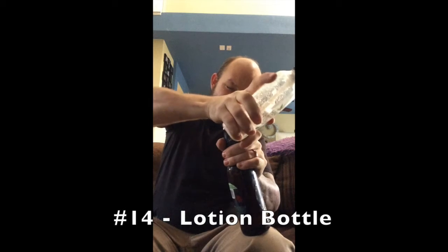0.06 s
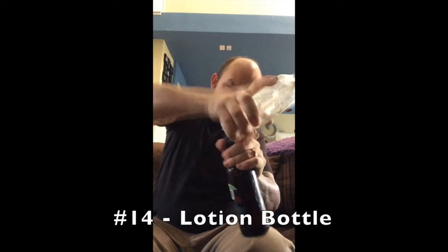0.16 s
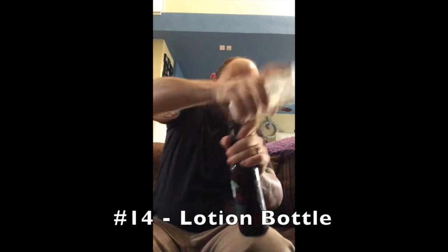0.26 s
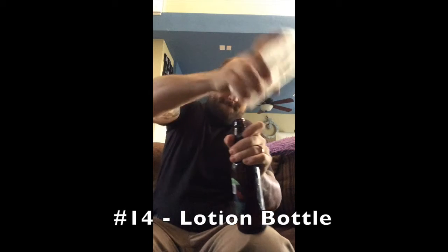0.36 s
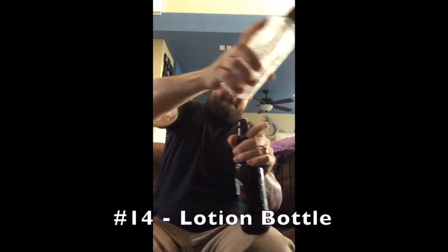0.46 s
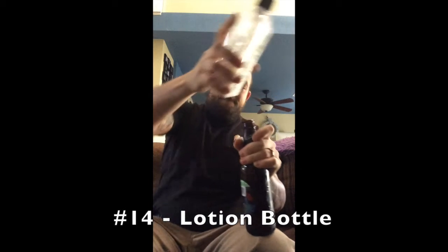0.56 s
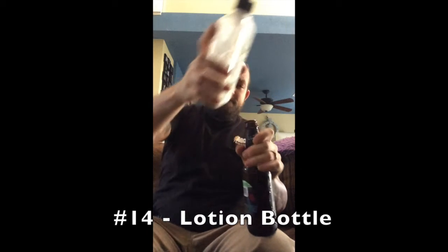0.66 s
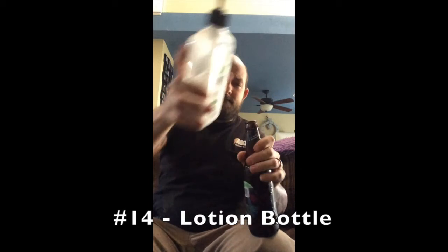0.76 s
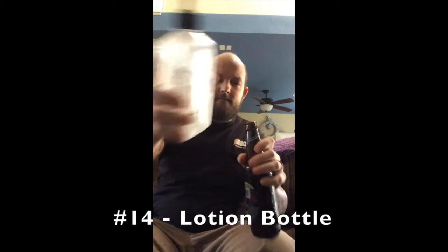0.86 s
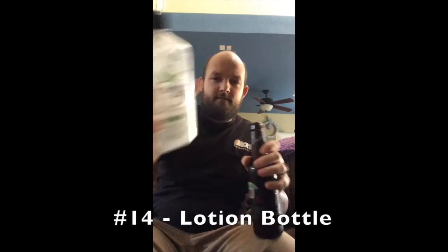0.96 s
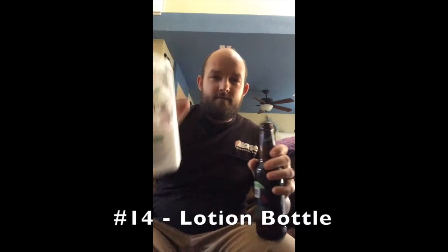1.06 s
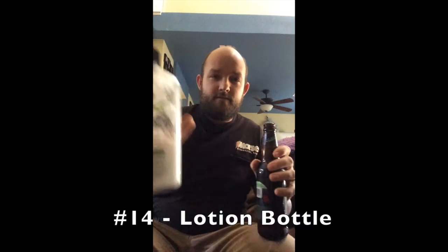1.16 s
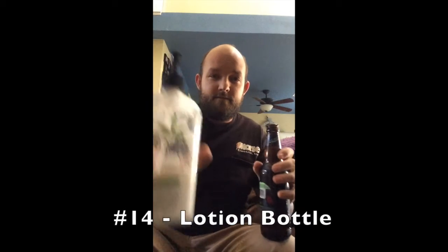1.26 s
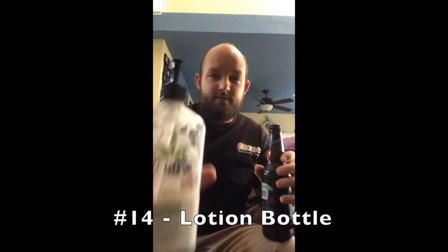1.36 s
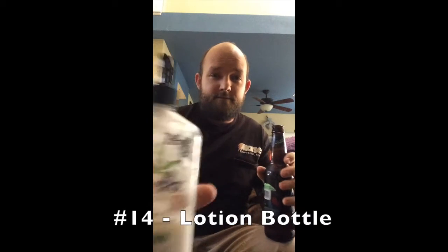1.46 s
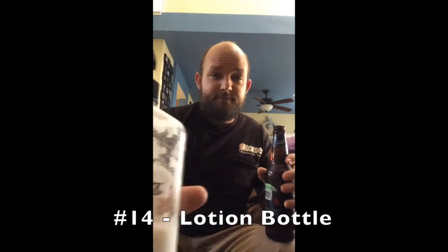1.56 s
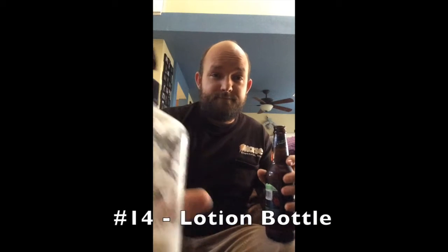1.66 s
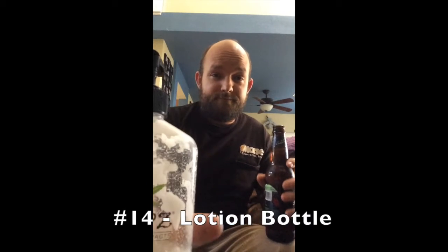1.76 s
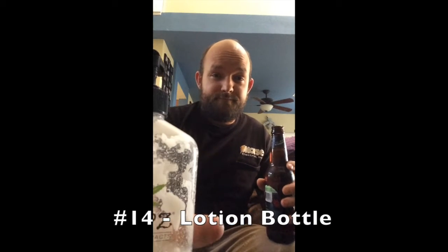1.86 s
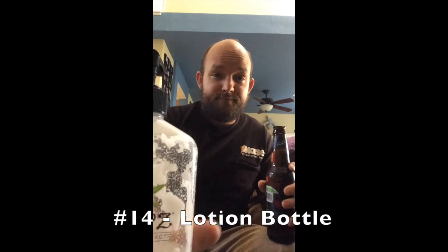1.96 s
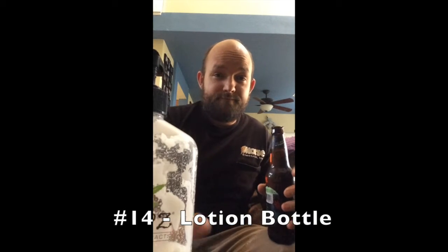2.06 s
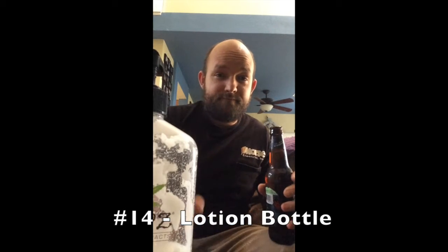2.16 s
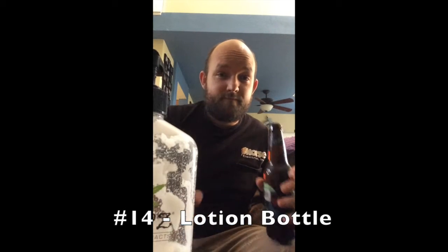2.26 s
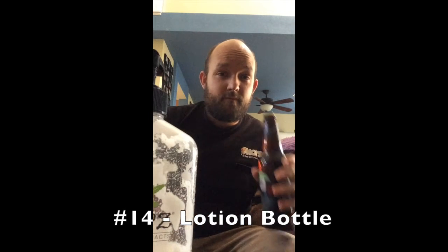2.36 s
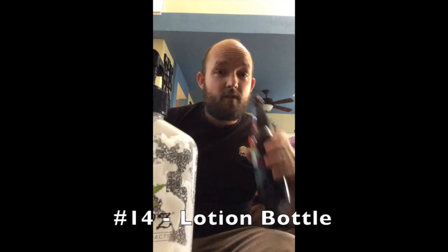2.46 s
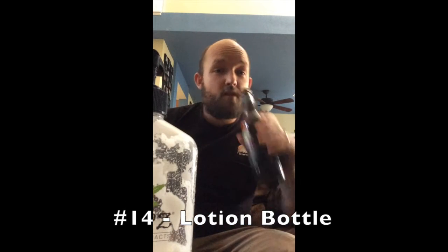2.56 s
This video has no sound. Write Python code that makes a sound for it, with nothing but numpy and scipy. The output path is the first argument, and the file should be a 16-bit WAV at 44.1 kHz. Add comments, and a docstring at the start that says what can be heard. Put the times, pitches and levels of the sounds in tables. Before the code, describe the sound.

A cap hisses and pops off a glass bottle, then a plastic bottle knocks down.

```python
"""A quiet room with a low rumble and faint rustling now and then.
Gas hisses from under a levered bottle cap. The cap scrapes and pops; the glass and the air in the
neck ring. The cap lands and small things tick. Later a plastic bottle is set down near the
microphone: it knocks on a table, which rings, and rocks on its base."""
import sys
import numpy as np
from scipy import signal
from scipy.fft import rfft, irfft, next_fast_len
from scipy.io import wavfile
from scipy.ndimage import uniform_filter1d

SR = 44100
rng = np.random.default_rng(int(sys.argv[2]) if len(sys.argv) > 2 else 0)


def store_wav(level_fs):
    """Save 16-bit WAV to argv[1]."""
    pcm = np.round(np.clip(np.atleast_2d(level_fs), -1, 1) * 32767)
    wavfile.write(sys.argv[1], SR, pcm.T.astype(np.int16))


N = 114660
TIME_S = np.arange(N) / SR
POP_S = 0.2048


def pop():
    """The cap snaps off, bottle and cap ring, and the room answers diffusely."""
    # Bottle and cap modes. Each row: frequency in Hz, relative level in dB, t60 in seconds.
    bottle_modes = [(123.5, -21.5, 0.036), (259.3, -13, .04), (576, -9, 0.045), (1065, -8.5, 0.026),
                    (1178, -2.5, 0.016), (1640, -14.5, 0.027), (2750, -7, 0.0061), (3440, -18.5, 0.037),
                    (3910, -13, 0.019), (5125, -11.5, 0.028), (5530, -18.5, .015), (6470, -13.5, .016),
                    (7040, -11, 0.013), (7890, -17, 0.022), (11530, -15, 0.0071)]
    # Lingering glass ring. Each row: centre in Hz, half-width in Hz, level in dB, t60 in seconds.
    glass_bands = [(775, 31, -46, 0.61), (3465, 35, -55, 0.85), (3480, 70, -54, 0.45), (5100, 69, -51, .5),
                   (5240, 70, -49, 0.39), (7950, 70, -56, 0.47)]
    # Spectra of the snap and the room's answer. Each row: frequency in Hz, relative density in dB.
    snap_spectrum = [(880, -28.5), (1500, 3.5), (2630, -7), (3570, -7.5), (4480, -18.5), (5090, -1),
                     (5900, -16), (7930, -12), (8580, -10), (14700, -16), (15800, -36.5)]
    answer_spectrum = [(88, -51), (150, -17.5), (274, -7.5), (472, -12.5), (573, -3.5), (696, -5),
                       (813, -4.5), (950, -13), (1270, -15.5), (1740, -14), (2230, -23), (3050, -30.5),
                       (3560, -19), (4590, -32), (5360, -19.5), (6020, -32), (6380, -25.5), (9410, -30.5),
                       (15300, -41.5)]
    snap = amp(-16) * decay(POP_S, t60_s=0.024, rise_s=0.0005) * noise(snap_spectrum, patchy_db=3.5)
    glass = np.zeros(N)
    for centre_hz, width_hz, db, t60_s in glass_bands:
        band = filtered(rng.standard_normal(N), lambda hz: 1 / (1 + ((hz - centre_hz) / width_hz) ** 2))
        glass += amp(db) * decay(POP_S, t60_s, rise_s=0.014) * unit(band)
    bottle = amp(-6) * ring(POP_S, bottle_modes, rise_s=0.00067)
    return bottle + snap + glass + amp(-31) * diffuse_answer(POP_S, answer_spectrum, rise_s=0.014)


def neck():
    """The air in the neck rings at the pop; its tone returns in ever weaker, wavering swells."""
    # Swells of the tone. Each row: start in seconds, level in dB, length in seconds.
    swells = [(0.3167, -32.5, 0.058), (.41, -45.5, 0.046), (.51, -53, 0.066), (.6, -59.5, 0.035)]
    waver_hz, fall_s = 3.5, 0.0081
    returns = np.zeros(N)
    for start_s, db, length_s in swells:
        hz = 825 + waver_hz * rng.normal()
        gate = np.clip((start_s + length_s - TIME_S) / fall_s + 1, 0, 1)
        returns += gate * mode(start_s, hz, db, t60_s=0.25, rise_s=0.0029)
    first = mode(POP_S, hz=824, db=-5.5, t60_s=0.079, rise_s=0.0031)
    return room(first, wet_db=-23.5) + room(returns, wet_db=-12.5)


def setdown():
    """A plastic bottle slaps down, its edge rings, it rocks; the table rings and shudders."""
    # Modes of table with bottle, and of the bottle's edge. Each row: frequency in Hz, gain in dB, t60 in
    # seconds.
    table_modes = [(87, -12.5, 0.054), (133, -16.5, 0.28), (289, -23, .1), (265, -18, 0.015),
                   (341, -8, 0.044), (413, 1, 0.026), (478, -3, 0.047), (580, -11, 0.0097)]
    edge_modes = [(750, -12.5, 0.012), (1150, -15.5, 0.0088), (1402, -10.5, 0.0078), (2050, -18.5, 0.015),
                  (2270, -28, 0.0098)]
    # Spectra of the slap and of table and room answering. Each row: frequency in Hz, relative dB.
    slap_spectrum = [(1470, -15), (2500, -6), (4300, -10.5), (5880, -15), (7210, -20), (8630, -21),
                     (14300, -29.5), (16300, -58)]
    shudder_spectrum = [(65, -45), (110, -3), (152, -3), (202, -12.5), (322, 1.5), (512, -8), (591, -7),
                        (667, -16), (833, -15), (903, -23), (1060, -15), (1130, -20), (2250, -27),
                        (3300, -40.5), (3580, -34.5), (4950, -42.5), (13900, -50)]
    # The bottle rocks on its base. Each row: start in seconds, gain in dB.
    rocks = [(1.81, -22), (1.829, -25.5)]
    slap_s, knock_s, edge_s, table_rise_s = 1.7748, 1.7761, 1.7772, 0.0024
    slap = amp(-24.5) * decay(slap_s, t60_s=0.013, rise_s=0.00052) * noise(slap_spectrum, patchy_db=-1.5)
    knock = amp(-4.5) * ring(knock_s, table_modes, table_rise_s)
    edge = ring(edge_s, edge_modes, rise_s=0.00038)
    rocking = sum(amp(db) * ring(start_s, table_modes[2:], table_rise_s) for start_s, db in rocks)
    shudder = amp(-25.5) * diffuse_answer(knock_s, shudder_spectrum, rise_s=0.0038)
    return slap + knock + edge + rocking + shudder


def gas():
    """The jet swells as the cap lifts, deepens as the gap widens and stops when the pressure is gone."""
    # Hiss of the narrow and the wide gap. Each row: time in seconds, level in dB.
    narrow_levels = [(0.0, -99), (0.014, -88.5), (0.018, -58), (0.068, -36.5), (0.1, -35), (0.116, -41),
                     (0.134, -67), (0.17, -85)]
    wide_levels = [(.03, -99), (.044, -70), (.05, -52), (.09, -44), (.115, -48), (.13, -75), (.15, -100)]
    # Their spectra. Each row: frequency in Hz, relative density in dB.
    narrow_spectrum = [(1500, -50), (2600, -16), (3060, -11), (3410, 1), (4420, -6), (7760, 4.5),
                       (8890, -5.5), (10100, 6.5), (10900, -6.5), (13600, 6), (15300, -3)]
    wide_spectrum = [(500, -50), (800, -10), (1330, -4), (1790, 2), (2400, -2), (3200, -20), (5000, -50)]
    narrow = envelope(narrow_levels + [(POP_S, -120)]) * noise(narrow_spectrum, patchy_db=2)
    wide = envelope(wide_levels) * noise(wide_spectrum, patchy_db=2)
    return narrow + wide


def scrape():
    """The cap slips on the lip, ever louder until the pop."""
    # Scrape spectrum. Each row: frequency in Hz, relative density in dB.
    spectrum = [(900, -40), (1700, 0), (2600, -14), (3500, -6), (4800, -20), (6500, -8), (8500, -26),
                (15000, -32)]
    start_s, start_db, growth_db = 0.19, -58, 24
    progress = np.clip((TIME_S - start_s) / (POP_S - start_s), 0, 1)
    slipping = (progress > 0) & (progress < 1)
    return amp(start_db + growth_db * progress) * slipping * noise(spectrum, patchy_db=2)


def ticks():
    """Small ticks and bumps: each a short ring and a noise click around the same pitch."""
    # Each row: start in seconds, level in dB, pitch in Hz, ring t60 in seconds, click over ring in dB.
    hits = [(.2295, -36, 5260, .04, -4.5), (.5198, -51.5, 9760, 0.027, 5.5),
            (.521, -60.5, 6950, 0.037, -14), (0.593, -65, 5920, 0.011, -1),
            (0.7686, -47.5, 3400, 0.042, -7.5), (0.789, -52.5, 1720, 0.022, -18),
            (0.8891, -55, 1830, 0.012, 2), (.888, -59.5, 7700, .012, -4), (.913, -66, 5160, 0.012, -8),
            (0.981, -41, 125, 0.07, -28), (1.2133, -65, 4050, 0.013, -1), (1.669, -57, 2450, 0.021, -1),
            (1.685, -51, 505, 0.044, -3.5), (2.464, -53, 1030, 0.021, -28.5),
            (2.4777, -41.5, 6330, 0.01, -7.5), (2.477, -63, 11800, 0.0069, 11),
            (2.587, -56, 3830, 0.0084, -3.5)]
    width_octaves, top_hz, low_edge_ratio = 1.46, 14320, 0.34
    grit, out = rng.standard_normal(N), np.zeros(N)
    for start_s, db, pitch_hz, t60_s, click_db in hits:
        def click_band(hz):
            octaves = np.log2((hz + 1) / pitch_hz)
            edges = (hz / top_hz) ** 10 + (low_edge_ratio * pitch_hz / (hz + 1)) ** 2
            return np.exp(-(octaves / width_octaves) ** 2 - edges)

        click = decay(start_s, t60_s=0.011, rise_s=0.0005) * unit(filtered(grit, click_band))
        out += mode(start_s, pitch_hz, db, t60_s, rise_s=0.0002) + amp(db + click_db) * click
    return out


def background():
    """Room air, a low wavering rumble and faint rustling."""
    # Their spectra. Each row: frequency in Hz, relative density in dB.
    air_spectrum = [(180, -30), (300, -1), (426, -5), (616, -6.5), (791, -10.5), (1140, -16.5),
                    (1330, -10.5), (2820, -25), (6090, -31), (7690, -31.5), (14800, -41.5), (16300, -54)]
    rumble_spectrum = [(15, -48), (25, -11), (70, -2.5), (124, -6), (145, -12.5), (178, 2), (211, -9),
                       (270, -5), (300, -17), (390, -47.5), (660, -120)]
    rustle_spectrum = [(1180, -13), (2000, -7), (3870, -14), (4610, -24), (13700, -19), (16000, -49)]
    # Rumble and rustle over time. Each row: time in seconds, level in dB.
    rumble_levels = [(0.0, -62), (0.25, -54), (0.41, -63), (0.62, -62), (1.14, -60.5), (1.33, -60.5),
                     (1.8, -58.5), (2.03, -68.5), (2.21, -60.5), (2.37, -59.5), (2.6, -61)]
    rustle_levels = [(.6, -92.5), (.885, -92), (.895, -64.5), (.95, -95.5), (1.2, -97), (1.22, -80),
                     (1.37, -76.5), (1.48, -103), (1.9, -89), (1.98, -76), (2.02, -68.5), (2.05, -97),
                     (2.13, -91), (2.16, -70.5), (2.35, -79.5), (2.5, -70.5), (2.6, -78)]
    air = amp(-64) * noise(air_spectrum, patchy_db=2)
    rumble = envelope(rumble_levels) * noise(rumble_spectrum, patchy_db=1.5)
    rustle = envelope(rustle_levels) * noise(rustle_spectrum, patchy_db=1.5)
    return air + rumble + rustle


def room(x, wet_db):
    """x plus the room's delayed reverberation."""
    predelay_s = 0.017
    tail = room_tail(SR // 2)
    impulse = np.pad(tail / np.linalg.norm(tail), (round(predelay_s * SR), 0))
    return x + amp(wet_db) * signal.fftconvolve(x, impulse)[:N]


def diffuse_answer(start_s, spectrum, rise_s):
    """A coloured room tail that swells after a blow."""
    start, top_hz = round(start_s * SR), spectrum[-1][0]
    tail = np.pad(room_tail(N - start), (start, 0))
    tail = filtered(tail, lambda hz: amp(log_interp(spectrum, hz)) * lowpass(hz, top_hz))
    early_rms = np.std(tail[start:start + SR // 20])
    return tail / early_rms * decay(start_s, np.inf, rise_s) ** 2


def room_tail(samples):
    """Noise in which each frequency dies at the room's rate."""
    # Reverberation times. Each row: frequency in Hz, t60 in seconds.
    room_t60 = [(100, 0.37), (400, 0.28), (1500, .33), (3500, 0.4), (6000, 0.31), (9000, 0.27),
                (15000, 0.25)]
    hz, time_s, bins = signal.stft(rng.standard_normal(samples), SR, nperseg=256)
    fade = amp(-60 * time_s / log_interp(room_t60, hz)[:, None])
    return signal.istft(bins * fade, SR, nperseg=256)[1][:samples]


def noise(spectrum, patchy_db):
    """Coloured noise of rms 1 with random gain patches in time and frequency."""
    bins = signal.stft(rng.standard_normal(N + 512), nperseg=512)[2]
    patches = uniform_filter1d(rng.standard_normal(bins.shape), size=6, axis=0)
    patches = uniform_filter1d(patches, size=8, axis=1)
    patchy = signal.istft(bins * amp(patchy_db * unit(patches)), nperseg=512)[1][:N]
    return unit(filtered(patchy, lambda hz: amp(log_interp(spectrum, hz)) * lowpass(hz, top_hz=15330)))


def ring(start_s, modes, rise_s):
    """Modes struck together."""
    return sum(mode(start_s, hz, db, t60_s, rise_s) for hz, db, t60_s in modes)


def mode(start_s, hz, db, t60_s, rise_s):
    """One damped sine."""
    return amp(db) * decay(start_s, t60_s, rise_s) * np.sin(2 * np.pi * hz * (TIME_S - start_s))


def decay(start_s, t60_s, rise_s):
    """Envelope of a blow: exponential rise and fall."""
    age_s = np.maximum(TIME_S - start_s, 0)
    return amp(-60 * age_s / t60_s) * (1 - np.exp(-age_s / rise_s))


def envelope(levels):
    """Gain per sample from (seconds, dB) points."""
    time_s, db = np.transpose(levels)
    return amp(np.interp(TIME_S, time_s, db))


def filtered(x, response):
    """x through a frequency response, given as a function of Hz."""
    size = next_fast_len(N + SR // 2)
    return irfft(rfft(x, size) * response(np.fft.rfftfreq(size, 1 / SR)), size)[..., :N]


def lowpass(hz, top_hz, edge_hz=30):
    """Gain of a steep, smooth low-pass edge."""
    return 0.5 - 0.5 * np.tanh((hz - top_hz) / edge_hz)


def log_interp(points, hz):
    """(Hz, value) points interpolated on a log frequency axis."""
    points_hz, values = np.transpose(points)
    return np.interp(np.log(hz + 1), np.log(points_hz + 1), values)


def amp(db):
    """dB to gain."""
    return 10 ** (np.asarray(db) / 20)


def unit(x):
    """x scaled to rms 1."""
    return x / np.sqrt(np.mean(x ** 2) + 1e-20)


def scene():
    """All sources in the room, mono."""
    near = room(gas(), wet_db=-20) + scrape() + pop() + setdown() + room(ticks(), wet_db=-20.5)
    return (near + neck() + background())[None]


def record(dry):
    """The microphone loses the deep bass and all above its band limit."""
    low_cut_hz, top_hz = 45, 16470
    return filtered(dry, lambda hz: lowpass(hz, top_hz) * (1j * hz / (low_cut_hz + 1j * hz)) ** 3)


dry = scene()
out = record(dry)
store_wav(out)
```